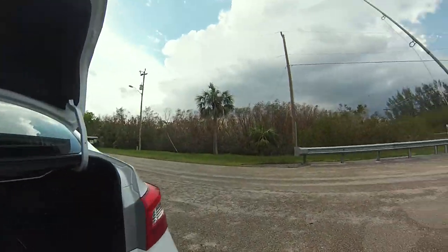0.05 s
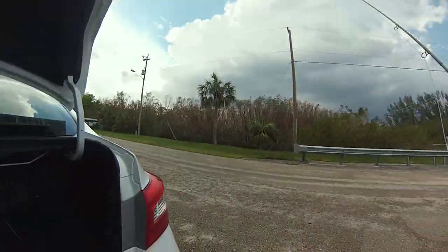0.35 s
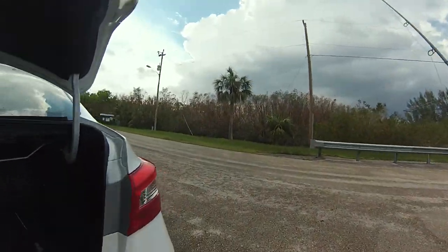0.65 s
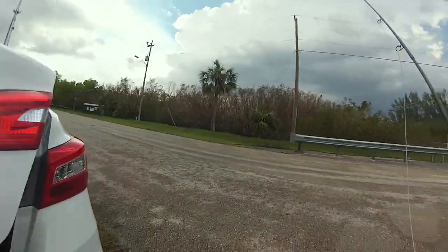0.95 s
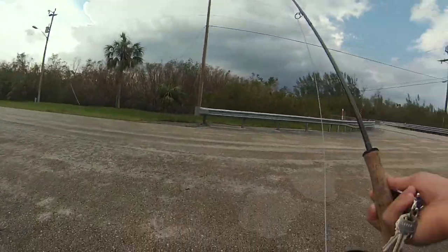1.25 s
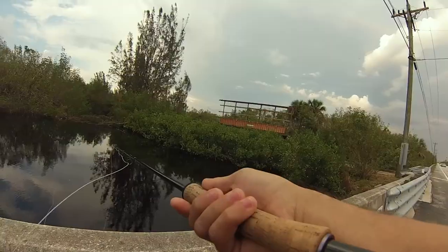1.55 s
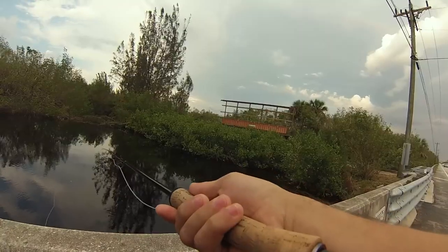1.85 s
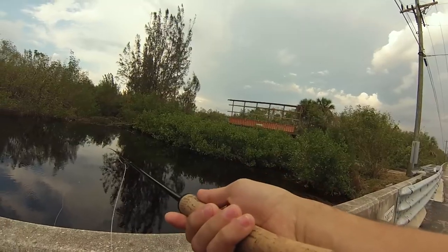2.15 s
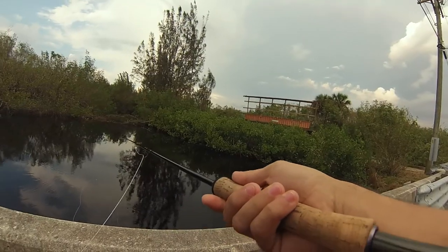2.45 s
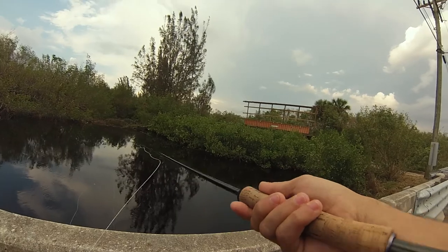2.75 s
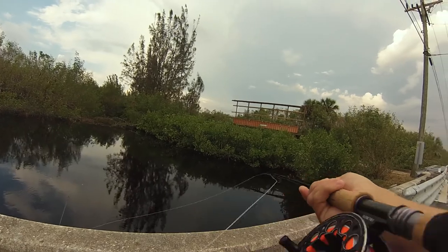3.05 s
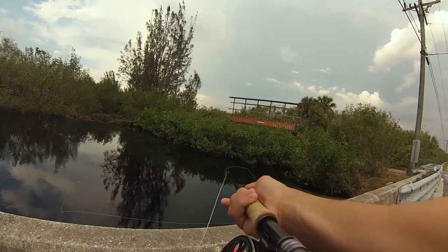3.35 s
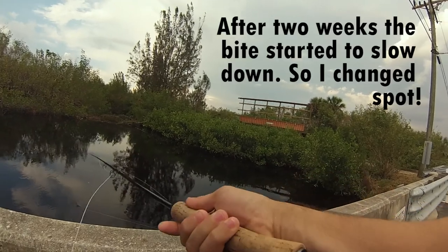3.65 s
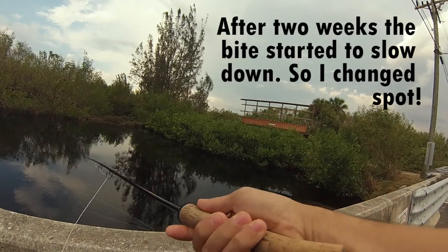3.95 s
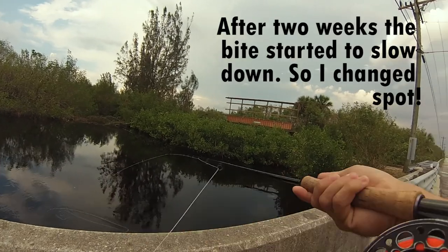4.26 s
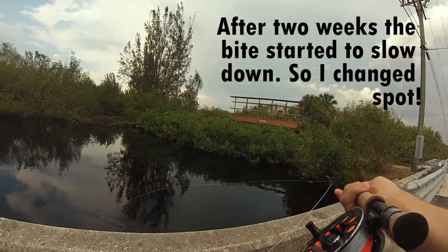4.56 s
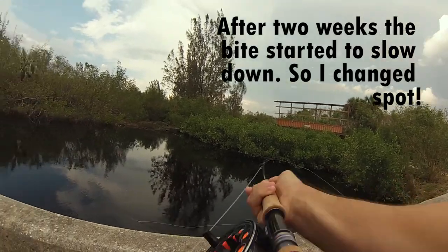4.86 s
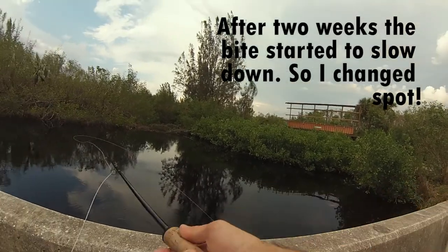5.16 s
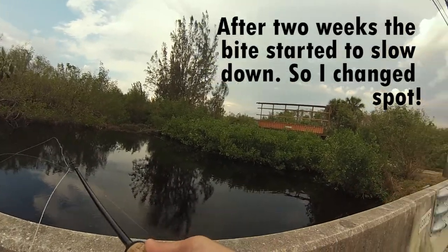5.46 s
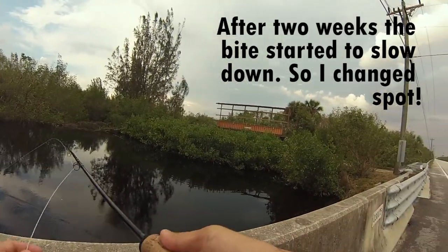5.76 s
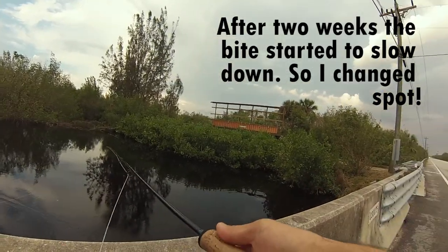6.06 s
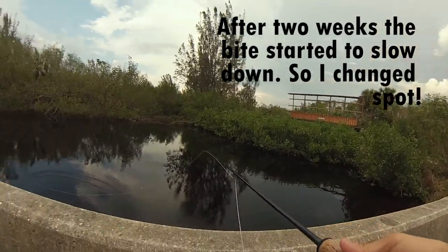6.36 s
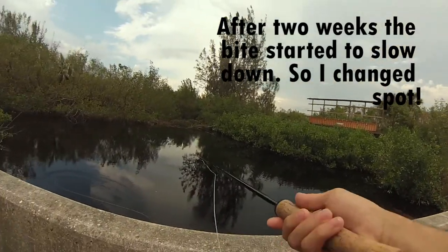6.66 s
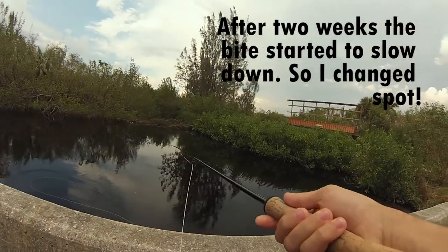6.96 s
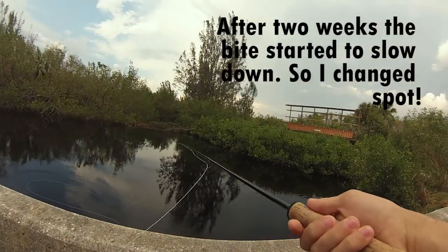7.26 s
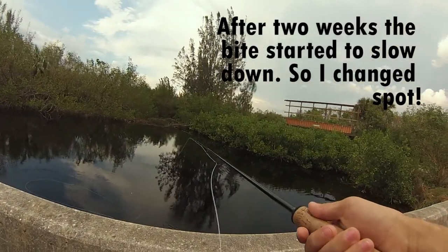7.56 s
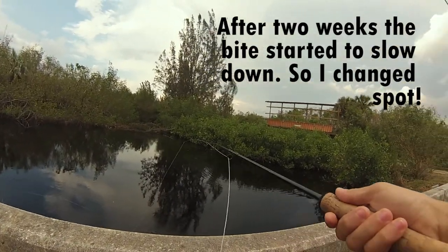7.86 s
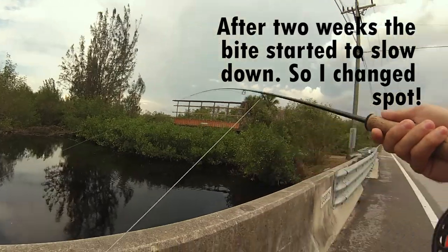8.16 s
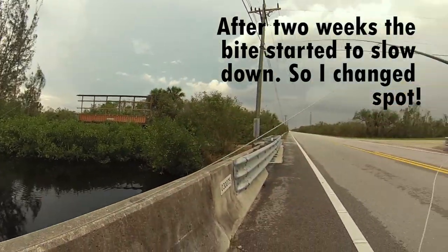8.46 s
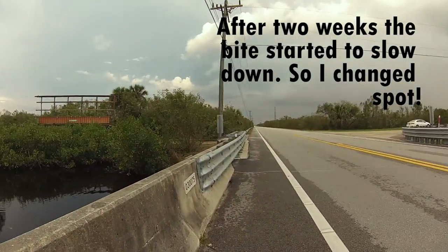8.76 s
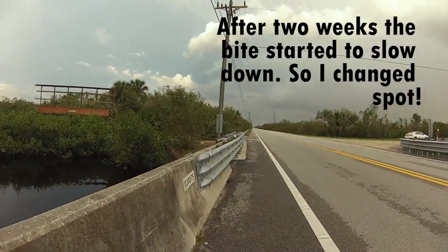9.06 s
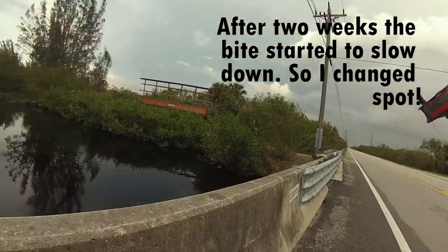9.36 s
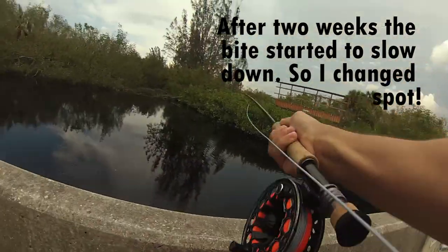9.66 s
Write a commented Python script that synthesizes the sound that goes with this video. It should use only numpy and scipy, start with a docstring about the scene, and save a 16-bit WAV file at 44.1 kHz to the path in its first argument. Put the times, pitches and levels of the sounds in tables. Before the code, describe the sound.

A car trunk slams shut, then a fly reel ticks faintly while cars rush past and wind thumps the microphone, ending with rod clacks.

```python
"""At a quiet roadside, after a faint click, a car's trunk lid swings down on knocking hinges, slams and
rattles in its latch; keys rustle faintly. Then, on a road bridge, cars rush past with roaring, hissing
tyres and droning engines, while gusts of wind thump on the microphone. Line is pulled off a fly-fishing
reel, which ticks as a small catch (the pawl) snaps over its gear teeth. Near the end the rod rubs in
the hand, clacks and bumps."""
import sys
import numpy as np
from scipy import signal
from scipy.fft import rfft, irfft, next_fast_len
from scipy.io import wavfile
from scipy.ndimage import map_coordinates

SR = 44100
rng = np.random.default_rng(int(sys.argv[2]) if len(sys.argv) > 2 else 0)


def output_pcm(signal):
    """Save a mono or channel-first signal as 16-bit PCM at the path in sys.argv[1].

    Samples are clipped to [-1, 1] before scaling.
    """
    pcm = np.clip(np.atleast_2d(signal).T, -1, 1) * 32767
    wavfile.write(sys.argv[1], SR, np.round(pcm).astype(np.int16))


N = 428652

# rustles, first of the keys, then of the hand on the rod: peak t/s, level/dB, length/s
RUSTLES = [(1.49, -66.5, 0.075), (8.78, -69, 0.13), (9.03, -72, 0.063), (9.5, -55.5, 0.06),
           (9.622, -49.5, 0.035)]
# tone of a rustle: f/Hz, level/dB
RUSTLE_TONE = [(1200, -7.5), (2800, 3), (6100, -5.5), (7000, -0.5), (8300, -19), (11000, -14.5),
               (16000, -24.5)]


def amp(db):
    """Turn decibels into a number to multiply a sound by."""
    return 10 ** (np.asarray(db) / 20)


def unit(x):
    """Scale a sound to an average strength (rms) of 1."""
    return x / np.sqrt(np.mean(x ** 2) + 1e-20)


def clock():
    """The time of every sample, in seconds."""
    return np.arange(N) / SR


def curve(rows):
    """Join (t/s, value) points with straight lines."""
    return np.interp(clock(), *np.transpose(rows))


def wobble(rate):
    """A smooth curve through `rate` random points a second."""
    return map_coordinates(rng.standard_normal(int(N * rate / SR) + 4), [clock() * rate])


def filtered(x, response):
    """Multiply each frequency in x by response(frequency)."""
    size = next_fast_len(len(x) + 8192)
    return irfft(rfft(x, size) * response(np.fft.rfftfreq(size, 1 / SR)), size)[:len(x)]


def noise(spectrum, size=N):
    """Looping noise of strength 1, its tone shaped by (f/Hz, level/dB) points."""
    f, db = np.transpose(spectrum)
    gain = amp(np.interp(np.log(np.fft.rfftfreq(size, 1 / SR) + 1), np.log(f), db))
    return unit(irfft(rfft(rng.standard_normal(size)) * gain, size))


def resonate(x, modes):
    """Make x ring at the pitches given as (f/Hz, width/Hz, level/dB)."""
    return filtered(x, lambda f: sum(amp(db) * 1j * f * width / (hz * hz - f * f + 1j * f * width)
                                     for hz, width, db in modes))


def fade(t60, attack):
    """A one-second loudness shape: it rises quickly, then drops 60 dB every t60 seconds."""
    t = np.arange(SR) / SR
    return np.exp(-np.log(1000) * t / t60) * (1 - np.exp(-t / attack))


def swells(rows):
    """A loudness shape of (peak t/s, level/dB, length/s) swells that rise faster than they fall."""
    t, power = clock(), np.zeros(N)
    for s, db, length in rows:
        width = np.where(t < s, 0.84 * length, length)
        power += amp(db) ** 2 / (1 + ((t - s) / width) ** 2) ** 3
    return np.sqrt(power)


def add(track, s, sound):
    """Mix a sound into the track, starting at s seconds."""
    part = track[max(round(s * SR), 0):][:len(sound)]
    part += sound[:len(part)]


def open_air():
    """The outdoors makes a faint, low, steady rush."""
    # tone of the open air: f/Hz, level/dB
    quiet = [(20, -18.5), (62, -10.5), (103, -7), (260, -25), (900, -26.5), (1250, -38), (2600, -40),
             (12000, -53), (15500, -66.5)]
    return amp(-62) * noise(quiet)


def click_and_hinges():
    """A faint click as the sound begins; then the lid's arms knock and scrape as it is pulled down."""
    # the click, then the hinge knocks: t/s, level/dB, f/Hz, fade time/s, hiss compared with ring/dB
    taps = [(.008, -57, 885, 0.21, -0.5), (0.182, -49, 450, 0.18, -42), (0.61, -49.5, 710, 0.055, -31),
            (0.904, -55, 825, 0.16, -12), (1.005, -50.5, 754, 0.16, 0), (1.022, -52.5, 425, 0.26, -28),
            (1.486, -52.5, 1290, 0.13, -25)]
    out = np.zeros(N)
    for s, db, hz, t60, hiss_db in taps:
        mode = [(hz, hz / 2, 0)]
        ring = unit(resonate(rng.standard_normal(SR), mode))
        ring = unit(resonate(ring, mode))  # twice, to leave little treble
        hiss = amp(hiss_db) * noise([(500, 0), (2000, 0), (5500, -7.5), (13000, -26)], size=SR)
        add(out, s, amp(db) * (ring + hiss) * fade(t60, attack=0.00076))
    return out


def slam():
    """The lid hits its seal and latch and bounces, shaking the sheet metal; trapped air thumps."""
    # hits of the lid: t/s, sheet metal level/dB, latch level/dB, latch fade time/s
    hits = [(1.18, -22.5, -45, .08), (1.192, -16.5, -29, 0.068), (1.1997, -11.5, -46.5, .03),
            (1.2028, -30.5, -14, .048), (1.2343, -27.5, -33, 0.037), (1.2602, -29.5, -26, 0.047),
            (1.269, -24.5, -35, 0.04), (1.314, -41, -51, 0.046), (1.33, -31, -35.5, 0.031),
            (1.3343, -28.5, -29, 0.042), (1.41, -38, -46.5, 0.05), (1.419, -31, -44, 0.042)]
    # tone of the sheet metal's bang and of the latch's crack: f/Hz, level/dB
    panel_tone = [(65, -3), (120, -8), (180, -4), (270, -9.5), (380, -9.5), (560, -9), (660, -10.5),
                  (840, 0), (1050, -6.5), (1400, -18.5), (1900, -23), (3000, -30.5), (8000, -55.5)]
    latch_tone = [(300, -20.5), (1300, 8.5), (2000, 0), (2700, -4.5), (3700, -2.5), (4700, 4.5),
                  (6300, -2.5), (7800, -4.5), (9200, -15.5), (12400, -5), (14000, -21.5), (16000, -20)]
    # ringing notes of the car body: f/Hz, level/dB, fade time/s
    body_notes = [(63.2, -6, 0.22), (188, -10, .22), (239, -12.5, 0.33), (293.5, -18, 0.21),
                  (403, -16, .22), (565, -12.5, 0.16), (733, -11, 0.2), (985, -13.5, 0.13),
                  (1448, -14, .13), (1744, -18, 0.12), (3870, -27, 0.13)]
    out, t = np.zeros(N), np.arange(SR) / SR
    steel_hz = np.exp(rng.uniform(*np.log((1404, 7980)), size=(48, 1)))  # notes of the latch's steel
    panel_fade = fade(t60=0.08, attack=0.0032) + amp(-18.5) * fade(t60=0.43, attack=0.0054)
    latch_tail = amp(-37.5) * fade(t60=0.3, attack=0.011)
    for s, panel_db, latch_db, latch_t60 in hits:
        steel_notes = np.sin(2 * np.pi * (steel_hz * t + rng.random(steel_hz.shape)))
        steel = unit(steel_notes.sum(0)) * fade(t60=0.09, attack=0.001)
        panel = noise(panel_tone, size=SR) * panel_fade
        ring = sum(amp(db + rng.standard_normal()) * np.sin(2 * np.pi * (hz * t + rng.random()))
                   * fade(t60, attack=0.002) for hz, db, t60 in body_notes)
        latch = noise(latch_tone, size=SR) * (fade(latch_t60, attack=0.00089) + latch_tail)
        add(out, s, amp(panel_db) * (panel + amp(-4) * ring))
        add(out, s, amp(latch_db) * (latch + amp(-12.5) * steel))
    thump = np.sin(2 * np.pi * 27 * t) * fade(t60=0.39, attack=0.0022)
    add(out, 1.196, amp(-20.5) * thump)
    # air is pushed out just ahead of the closing lid
    puff_db = curve([(1.0, -73.5), (1.08, -83), (1.17, -53), (1.2, -38.5), (1.3, -100)])
    puff = noise([(25, 5.5), (120, -5.5), (400, -21), (1000, -12.5), (4000, -55.5), (12000, -76.5)])
    return out + amp(puff_db) * puff


def keys():
    """Keys rustle faintly after the trunk shuts."""
    return swells(RUSTLES[:1]) * amp(3.6 * wobble(90)) * noise(RUSTLE_TONE)


def reel():
    """The pawl scrapes over each tooth and snaps down, faster and harder as the spool speeds up."""
    # pulls on the line: start t/s, fastest t/s, end t/s, top tick rate/Hz, level/dB
    pulls = [(1.533, 1.55, 1.595, 115, -56.5), (2.095, 2.368, 2.535, 255, -50.3),
             (6.87, 7.148, 7.32, 260, -52.5)]
    # slips over a single tooth: t/s, level/dB
    lone_ticks = [(2.022, -53), (2.069, -60), (2.546, -60), (6.819, -55)]
    # ringing notes of the pawl: f/Hz, width/Hz, level/dB
    pawl_notes = [(4480, 340, 1), (7650, 330, 5.5), (8520, 540, -4), (10300, 1500, -8), (12100, 1200, -12),
                  (15100, 700, -18)]
    ticks, t = np.zeros(N), clock()
    slow_db, top_speed_db = -9.5, 2.5
    for start, fastest, end, top_rate, db in pulls:
        speed = np.sqrt(np.interp(t, [start, fastest, end], [0, 1, 0]))
        teeth_passed = np.cumsum(top_rate * speed * amp(0.3 * wobble(60))) / SR
        at = np.flatnonzero(np.diff(np.ceil(teeth_passed)))  # one tick for each new tooth
        tick_db = db + slow_db * (1 - speed[at]) + top_speed_db * speed[at] ** 32
        ticks[at] = amp(tick_db + rng.standard_normal(len(at)))
    for s, db in lone_ticks:
        ticks[round(s * SR)] = amp(db)
    contact = signal.fftconvolve(ticks, fade(t60=0.004, attack=0.0001))[:N]
    scrape = amp(16) * contact * rng.standard_normal(N)
    return resonate(amp(21.5) * ticks + scrape, pawl_notes)


def passing_cars():
    """The gaps between tyre and road aim the roar like horns: we hear front, side and rear in turn."""
    # cars: nearest t/s, distance over speed/s, front/dB, side/dB, rear/dB, song/dB, whine/dB,
    # buzz/dB, hiss/dB, wake (the hiss that trails behind)/dB, wake delay/s, hiss pitch/ratio
    cars = [(3.46, 0.37, -25, -33.5, -31.5, -41.5, -40, -44.5, -45.5, -61.5, 1.57, 1.18),
            (5.83, 0.36, -25, -34, -28, -39.5, -37, -51, -54, -54.5, 0.65, 1.13),
            (7.21, 0.44, -30, -37.5, -38, -68, -30.5, -64, -58.5, -60.5, 0.75, 1.05),
            (7.46, 0.16, -35, -37.5, -27, -68, -34.5, -66, -62, -59, 0.19, 1.07)]
    # tyre roar from a car's front, side and rear: f/Hz, level/dB
    front = [(30, -33), (110, -9.5), (330, -19), (430, -9.5), (580, -10.5), (800, -1), (950, 1.5),
             (1230, -11), (1800, -6.5), (2300, -20.5), (2700, -23), (3300, -39), (5500, -68), (8500, -52),
             (15800, -85)]
    side = [(30, -13), (110, -5.5), (570, -4.5), (790, 3), (1030, -1), (1230, -14.5), (1700, -19.5),
            (2700, -19), (3300, -25), (5400, -26), (6500, -35.5), (12500, -50.5), (15800, -81)]
    rear = [(110, -9.5), (580, -12.5), (810, -1.5), (940, 2.5), (1090, -2.5), (1250, -8), (1800, -14.5),
            (2400, -26), (3400, -31.5), (6500, -75), (12500, -48.5), (14000, -87)]
    # the tread's forward song, its blocks' whine, its coarse buzz and its hiss: f/Hz, level/dB
    song = [(1250, -26), (1550, 4), (1850, 6), (2150, -2.5), (2400, -20.5), (2900, -8.5), (3300, -19.5),
            (4400, -29), (14000, -90)]
    whine = [(500, -28.5), (780, -10), (880, -9.5), (935, -0.5), (990, -6), (1150, -18.5), (2000, -29),
             (6000, -88)]
    buzz = [(1600, -38), (2150, -1.5), (2900, -6.5), (3400, -39)]
    hiss_tone = [(1800, -11.5), (2800, -5.5), (3300, 1.5), (4200, -1), (5200, -6), (7500, -17),
                 (9000, -23.5), (12000, -42), (15000, -62)]
    t, out = clock(), np.zeros(N)
    layers = [noise(tone) for tone in (front, side, rear, song, whine, buzz)]
    tread = noise(hiss_tone)
    for s, span, front_db, side_db, rear_db, song_db, whine_db, buzz_db, *hiss_settings in cars:
        place = (t - s) / span  # along the road; the car's nearest distance counts as 1
        distance = np.hypot(1, place)
        past = (1 + place / distance) / 2  # 0 while far ahead, 1 when long gone
        axle_surge = amp(3.5 * sum(np.exp(-((place + lead) / 0.19) ** 2) for lead in (0.64, 0)))
        gains = [amp(front_db) * (1 - past) ** 2.23 / distance ** 2.314,
                 amp(side_db) * axle_surge / distance ** 2.99,
                 amp(rear_db) * past ** 3.1 / distance ** 1.47,
                 amp(song_db) * (1 - past) / distance ** 1.2,
                 amp(whine_db + 2.4 * wobble(10)) * axle_surge * (1 - past) / distance ** 2.26,
                 amp(buzz_db) * (1 - past) / distance ** 2]
        roar = np.sum(gains * np.roll(layers, rng.integers(N), axis=1), axis=0)
        car = roar + tyre_hiss(t - s, distance, tread, *hiss_settings)
        out += car + road_echo(car, place, span, distance)
    return amp(0.56 * wobble(22)) * out  # moving air makes the sound flutter


def tyre_hiss(since, distance, tread, hiss_db, wake_db, wake_s, hiss_pitch):
    """Tread peels off the road: the hiss flares as a car arrives, sinks in pitch and swells behind it."""
    since_flare = since + 0.14  # seconds; the flare comes just before the car is nearest
    opened = (1 + np.tanh(since_flare / 0.019)) / 2
    flare_db = 7.5 * np.exp(-np.abs(since_flare) / 0.04)
    near = amp(hiss_db + flare_db - 9 * (1.5 - opened)) / distance ** 1.2
    wake = amp(wake_db) * np.exp(-((since / wake_s - 1) / 0.48) ** 2)
    pitch = hiss_pitch * (1 - 0.22 * np.tanh(since / 0.8))
    read_at = (rng.integers(N) + np.cumsum(pitch)) % N  # reading the noise more slowly lowers it
    gliding = map_coordinates(tread, [read_at], order=3, mode="grid-wrap", prefilter=False)
    return np.hypot(near, wake) * amp(wobble(11)) * gliding


def road_echo(car, place, span, distance):
    """The bounce off the road lags most just after a car passes, so the tone sweeps down and back up."""
    t, longest_lag_s, late_s = clock(), 0.002, 0.06
    bounce = filtered(car, lambda hz: 1 / (1 + (hz / 770) ** 4))  # rough asphalt scatters the treble
    lag = longest_lag_s / np.hypot(1, place - late_s / span) ** 1.56
    return 0.51 / np.sqrt(distance) * np.interp(t - lag, t, bounce)


def far_traffic():
    """Distant tyres blend into one even roar that grows at the end."""
    # tone of distant tyres: f/Hz, level/dB
    far_tone = [(30, -51), (110, -4), (550, -6.5), (920, 5.5), (1230, -7), (1750, -8.5), (2400, -26.5),
                (5500, -37.5), (14000, -97)]
    level_db = curve([(9.2, -50.5), (9.65, -42)]) + 0.28 * wobble(9.1)
    return amp(level_db) * noise(far_tone)


def hums():
    """Engines and the air inside tyres drone on wavering notes that sink as the cars go by."""
    # drones: peak t/s, level/dB, length/s, f/Hz, pitch drop after the peak/share
    drones = [(3.485, -47.5, 0.3, 77.4, .03), (3.577, -51, 0.536, 154.1, .09), (4.876, -47, 0.18, 108, .04),
              (5.906, -48.5, 0.733, 103.8, .08), (6.649, -53, 0.83, 243.2, 0.02)]
    t, out = clock(), np.zeros(N)
    for s, db, length, hz, sag in drones:
        pitch = hz * (1 - sag * np.tanh((t - s) / length) + 0.028 * wobble(20))
        note = unit(np.sin(2 * np.pi * np.cumsum(pitch) / SR))
        out += swells([(s, db, length)]) * amp(3.2 * wobble(18)) * note
    return out


def grit():
    """Fine grit sizzles behind the first car."""
    # swell of the sizzle: peak t/s, level/dB, length/s
    sizzle = [(3.66, -69.5, 0.28)]
    # tone of the grit: f/Hz, level/dB
    grit_tone = [(9000, -17), (12300, 0), (15000, -22)]
    return swells(sizzle) * noise(grit_tone)


def wind():
    """Gusts hit the microphone in quick lumps; the strong ones rumble deeper."""
    # gusts: peak t/s, level/dB, length/s
    gusts = [(4.85, -43, 0.22), (5.09, -44, 0.062), (5.7, -43.5, 0.83), (6.35, -42.5, 0.74),
             (7.44, -35.5, 0.17), (7.65, -44.5, 0.54), (8.12, -42, 0.092), (8.26, -35, 0.1),
             (8.38, -32.5, 0.072), (8.56, -34, 0.14), (8.73, -37.5, 0.16), (8.91, -39.5, 0.057),
             (9.06, -43, 0.18), (9.38, -35, 0.14), (9.55, -38, 0.085), (9.66, -30, 0.16)]
    # tone of wind on the microphone: f/Hz, level/dB
    wind_tone = [(12, 1), (60, 6), (110, 1), (270, -8.5), (550, -23.5), (1500, -46), (6000, -120)]
    strength = swells(gusts)
    rumble = unit(noise(wind_tone) * amp(1.2 * wobble(25)))
    deep = filtered(rumble, lambda hz: 1 / (1 + (hz / 57.6) ** 4))
    weakness = 1 / (1 + (strength / amp(-45)) ** 2)  # near 1 in light wind, near 0 in a strong gust
    return strength * (rumble - weakness * deep)


def fishing_rod():
    """The hand rubs along the grip, clacks ring the reel's frame, and the rod bumps dully."""
    # clacks of rod and reel: t/s, level/dB, fade time/s
    clacks = [(9.423, -34, 0.009), (9.439, -21.5, 0.011), (9.4442, -25.5, 0.0086), (9.4566, -31, 0.012),
              (9.4622, -18.5, 0.0082), (9.4753, -24.5, 0.01), (9.572, -38.5, 0.015)]
    # tone of a clack: f/Hz, level/dB
    clack_tone = [(400, -3), (1100, -4), (1800, 3.5), (3000, -2), (7000, -5.5), (8500, -12.5),
                  (11500, -7.5), (16000, -22)]
    # ring of the reel's metal frame: f/Hz, level/dB, fade time/s
    frame_notes = [(6840, -2, 0.0092)]
    t, bump_s = np.arange(SR) / SR, 9.643
    out = swells(RUSTLES[1:]) * amp(3.6 * wobble(90)) * noise(RUSTLE_TONE)
    for s, db, t60 in clacks:
        ring = sum(amp(level + 2 * rng.standard_normal()) * np.sin(2 * np.pi * hz * t)
                   * fade(decay, attack=0.0003) for hz, level, decay in frame_notes)
        clack = noise(clack_tone, size=SR) * fade(t60, attack=0.0003)
        add(out, s, amp(db) * (clack + ring))
    for k in range(3):  # the bump chatters, softer each time
        knock = unit(resonate(noise(clack_tone, size=SR), [(1500, 5700, 0)]))
        add(out, bump_s + k * 0.0024, amp(-22.5 - k) * knock * fade(t60=0.012, attack=0.00022))
    thump = np.sin(2 * np.pi * 75 * t) * fade(t60=0.036, attack=0.001)
    add(out, bump_s, amp(-24) * thump)
    return out


def housing(x):
    """The camera's shell dips and lifts the treble of sound from the road."""
    # effect of the shell: f/Hz, level/dB
    shell = [(5700, 0), (6450, -5.5), (7350, 0.5), (8300, -2.5)]
    hz, db = np.transpose(shell)
    return filtered(x, lambda f: amp(np.interp(f, hz, db)))


def scene():
    """The trunk shuts by the quiet road; then the bridge's traffic and wind come in."""
    bridge_start_s = 1.535
    on_bridge = np.clip((clock() - bridge_start_s) / 0.004, 0, 1)
    roadside = open_air() + click_and_hinges() + slam()
    bridge = housing(passing_cars() + far_traffic() + grit()) + hums() + wind()
    return (roadside + on_bridge * bridge + fishing_rod() + reel() + keys())[None]


def record(dry):
    """The camera's input rounds off the tallest peaks and cuts the very highest treble."""
    ceiling, top_hz = 0.69, 15850
    rounded = dry[0] / (1 + (dry[0] / ceiling) ** 4) ** 0.25
    return filtered(rounded, lambda hz: 1 / (1 + (hz / top_hz) ** 160))[None]


dry = scene()
out = record(dry)
output_pcm(out)
```